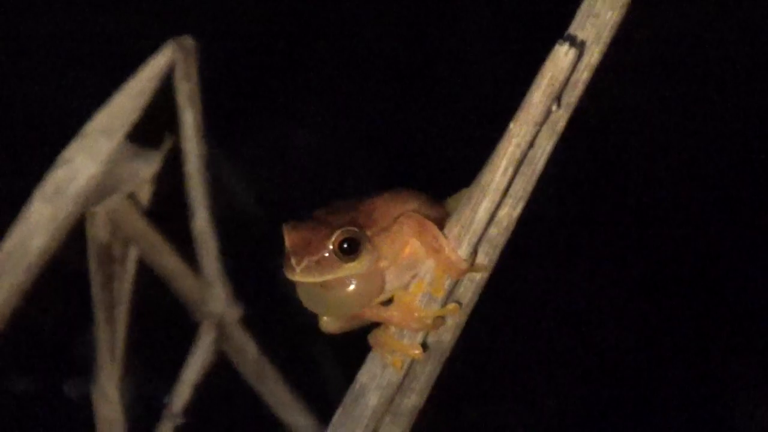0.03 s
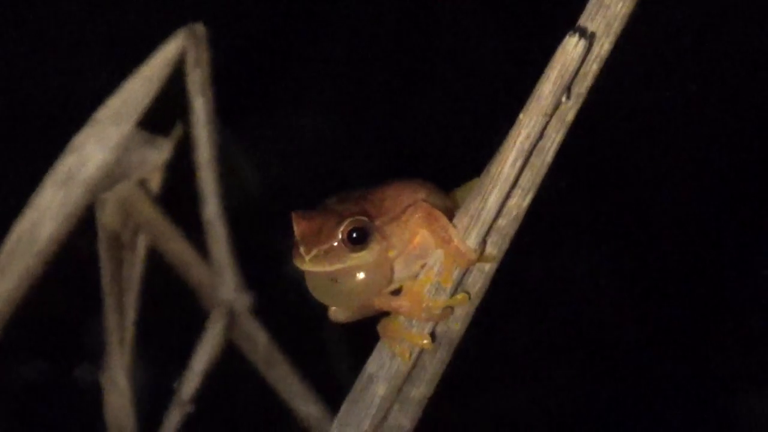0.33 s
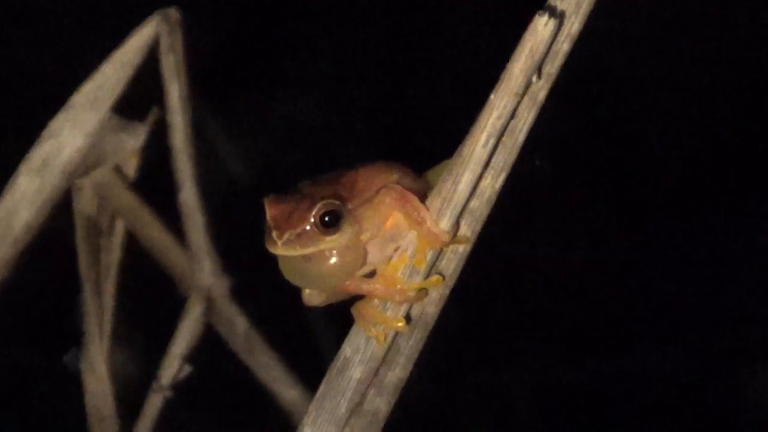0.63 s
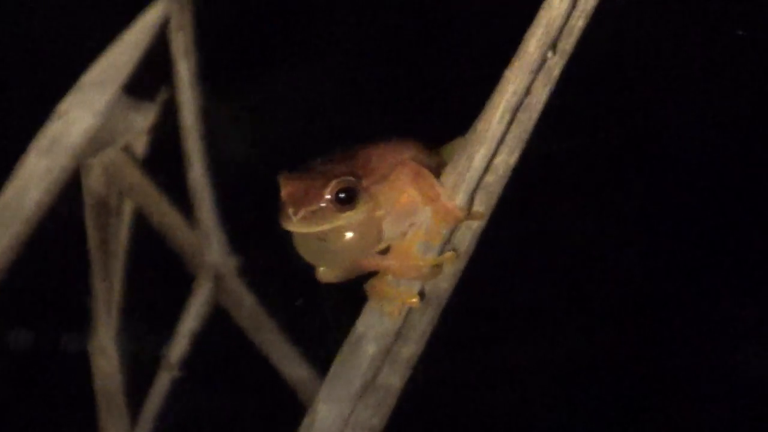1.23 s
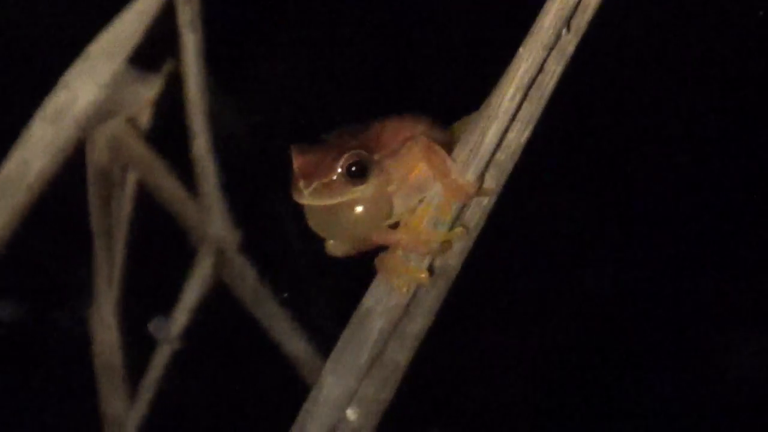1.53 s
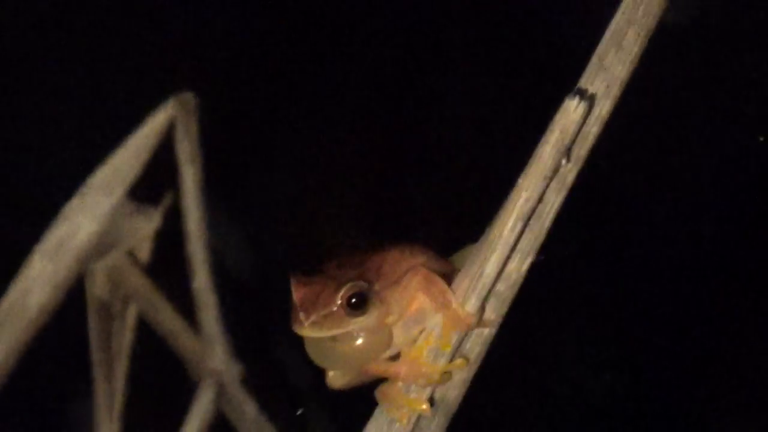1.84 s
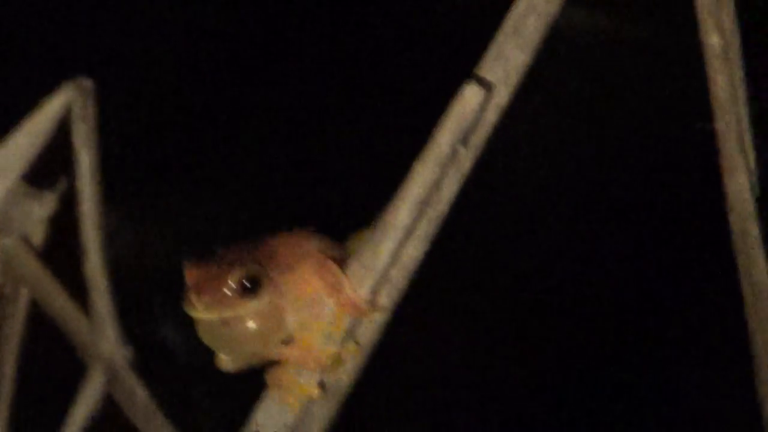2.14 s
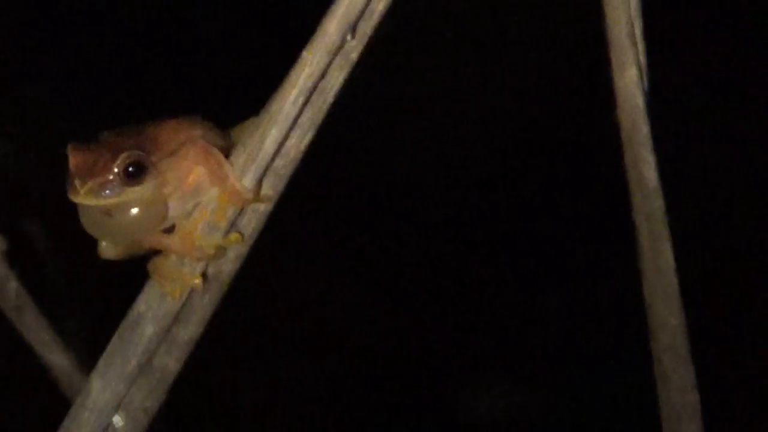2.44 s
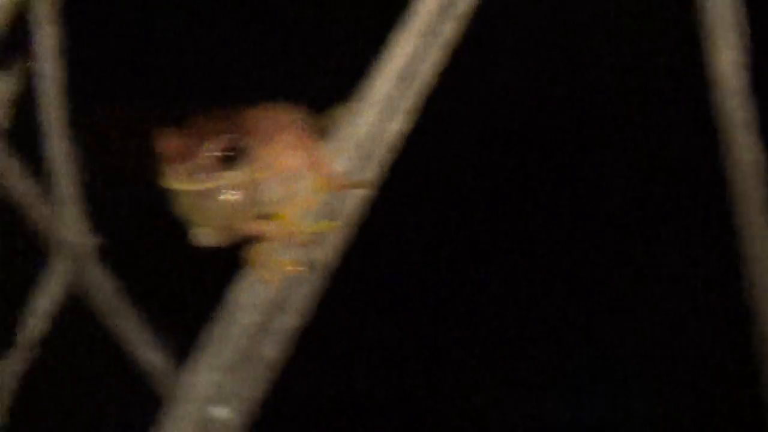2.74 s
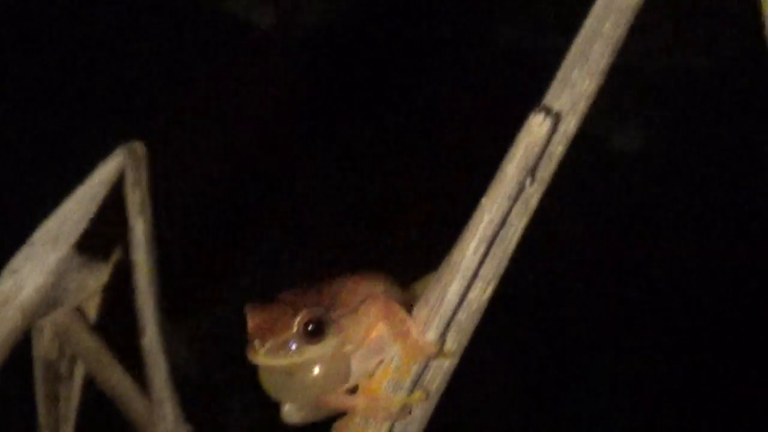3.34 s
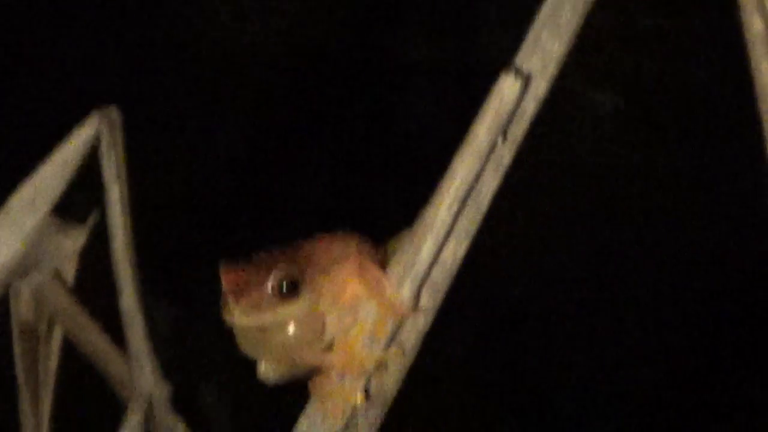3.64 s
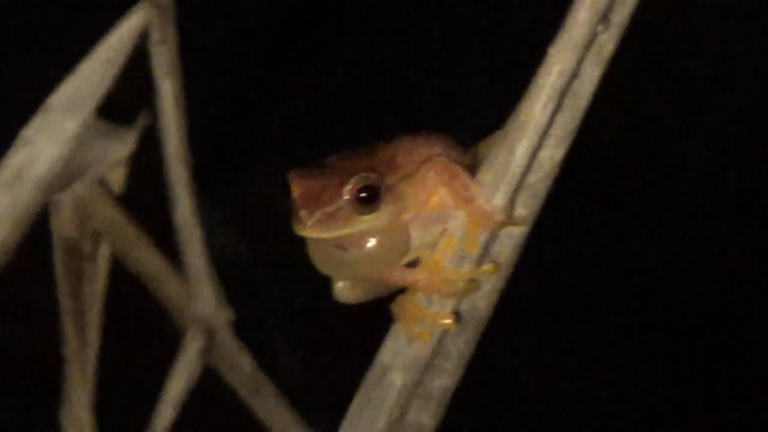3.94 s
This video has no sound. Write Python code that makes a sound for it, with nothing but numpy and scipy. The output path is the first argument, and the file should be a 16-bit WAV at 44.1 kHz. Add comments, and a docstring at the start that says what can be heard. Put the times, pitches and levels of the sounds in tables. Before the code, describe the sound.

Frogs call outdoors at night for about four seconds, with short falling whines two to four times a second, strongest at the start and near 0.9, 2.2, 2.9 and 3.9 seconds. Brief raspy croaks and pulsed rising sweeps fall between them. A low bloop comes at 0.3 seconds, and distant whoops from 0.8. Dense high insect trilling and cricket chirps run throughout, with a few small ticks and faint rumble.

```python
"""Night pond frog chorus

Near frogs give falling whines that swell at the vocal sac's resonance, and short croaks whose
pulses ring the throat. Another answers with a pulsed rising sweep; far ones whoop. Many insects
merge into a pulsing band above them, with single trills and cricket wing strokes standing out.
One bloop, a few ticks, low rumble and faint hiss; the plants give a light echo."""
import sys
import numpy as np
from scipy import signal
from scipy.io import wavfile
from scipy.ndimage import uniform_filter1d

SR = 44100
rng = np.random.default_rng(int(sys.argv[2]) if len(sys.argv) > 2 else 0)


def waveform_to_disk(signal):
    """Save audio, clipped to [-1, 1], as 16-bit WAV at the path in sys.argv[1]."""
    frames = np.transpose(np.atleast_2d(signal))
    scaled = np.clip(frames, -1, 1) * 32767
    samples = np.round(scaled).astype(np.int16)
    wavfile.write(sys.argv[1], SR, samples)


N = 176400


def amp(db):
    """dB to gain."""
    return 10 ** (np.asarray(db) / 20)


def unit(x):
    """Scale to rms 1."""
    return x / np.sqrt(np.mean(abs(x) ** 2) + 1e-20)


def read(points, hz):
    """Interpolate a spectrum over log frequency."""
    f, value = np.transpose(points)
    return np.interp(np.log(hz + 1), np.log(f), value)


def add(mix, start_s, sound, pan_db=0):
    """Mix in a sound; pan_db is left minus right."""
    at = round(start_s * SR)
    sound = sound[max(-at, 0):]
    part = mix[:, max(at, 0):][:, :len(sound)]
    part += amp([[pan_db / 2], [-pan_db / 2]]) * sound[:part.shape[1]]


def phase_of(hz):
    """Pitch curve to phase in rad."""
    return 2 * np.pi * np.cumsum(hz) / SR


def gate(t, rise_s, fall_s):
    """Linear fade in and out."""
    return np.clip(t / rise_s, 0, 1) * np.clip((t[-1] - t) / fall_s, 0, 1)


def drift(t, rate_hz):
    """Smooth complex noise, rms about 1."""
    size = N if len(t) > SR // 2 else SR // 2
    noise = rng.standard_normal(size) + 1j * rng.standard_normal(size)
    lowpass = np.exp(-(np.fft.fftfreq(size, 1 / SR) / rate_hz) ** 2)
    return unit(np.fft.ifft(noise * lowpass))[:len(t)]


def voice(hz, colour, low_db=0, harmonics=20):
    """Pulses coloured by the throat, which lets high harmonics out slightly later."""
    k = np.arange(1, harmonics + 1)[:, None]
    db = read(colour, k * hz) + low_db / (1 + (k * hz / 1900) ** 8)
    lag_rad = 4.75 * (k * hz / 2000) ** 2
    return unit((amp(db) * np.cos(k * phase_of(hz) - lag_rad)).sum(0))


def echo(x, t60_s, width=0.36):
    """Scatter from plants and water, partly alike in both ears."""
    t = np.arange(SR // 2) / SR
    reflections = rng.standard_normal((2, len(t))) * (rng.random((2, len(t))) < .05)
    mid, side = reflections * amp(-60 * t / t60_s) * (t > .004)
    tail = np.array([mid + width * side, mid - width * side])
    return signal.fftconvolve(x.mean(0)[None], tail / np.linalg.norm(tail[0]), axes=1)[:, :N]


# Calls: t/s, start f/Hz, f after drop/Hz, level/dB, sac boost/dB, 2nd harmonic/dB, upper ones/dB, L-R/dB
WHINES = [(-.12, 901, 675, -26.5, 13, 7, 4, 5.5), (.236, 905, 657.5, -34.5, -1, 1, -12, -3),
          (.275, 941, 686.5, -39, 6.5, 4, -3.5, -3.5), (.456, 937, 704, -36, 13.5, 2, 4.5, 1.5),
          (.941, 961, 666, -28.5, 11.5, -2, -10.5, 3.5), (1.418, 879, 660, -36, -3, -3.5, -21, -5.5),
          (1.831, 929, 697.4, -35, 13, 1.5, 3.5, 1.5), (2.152, 876, 678.6, -29.5, 8.5, 2, 0, 3),
          (2.618, 892, 655, -37.5, 2.5, -0.5, -13, -5.5), (2.865, 962, 662.6, -27.5, 10.5, 0.5, -9, 2.5),
          (3.105, 944, 682, -39, 4.5, 4, -8, -4.5), (3.28, 920, 674, -38.5, -2.5, -21, -27, -9.5),
          (3.609, 912.6, 714, -35.5, 13, 1.5, 3, 3.5), (3.7, 893.5, 652, -37, -1, -4, -10, -2.5),
          (3.903, 872, 652, -31, 11, 5.5, 0.5, 2.5)]
# Overtone spectrum: f/Hz, gain/dB
WHINE_COLOUR = [(900, -31), (1300, -13), (1700, -14), (2100, -15.5), (2600, -6), (3100, -18), (3700, -15),
                (5000, -32)]


def whines(drop_s=.043, sag_hz_per_s=700, sac_hz=794, sac_width_hz=106, fade_db_per_s=62):
    """Pitch drops fast, then sags; the unsteady call swells as it crosses the vocal sac's resonance."""
    out, t = np.zeros((2, N)), np.arange(0, 0.4, 1 / SR)
    for s, top_hz, low_hz, db, sac_db, second_db, upper_db, pan_db in WHINES:
        hz = low_hz + (top_hz - low_hz) * np.exp(-t / drop_s) - sag_hz_per_s * t
        waver = drift(t, 89)
        phase = phase_of(hz * (1 + 0.0053 * waver.real))
        call = amp(sac_db * np.exp(-((hz - sac_hz) / sac_width_hz) ** 2)) * np.sin(phase)
        overtones_db = [second_db, upper_db - 1.5, upper_db, upper_db - 9, upper_db - 13]
        for k, part_db in enumerate(overtones_db, 2):
            opening = np.minimum(t / 0.012 * amp(part_db), 1)  # weak overtones open later
            partial = (np.exp(1j * k * phase) * (1 + .55 * drift(t, 190))).imag
            call += amp(read(WHINE_COLOUR, k * hz) + part_db - 9.5 * t) * opening * partial
        wobble_db = 2.5 * drift(t, 23).real * np.minimum(t / 0.032, 1)
        shimmer = 1 + 0.25 * waver.imag
        envelope = gate(t, 0.0073, 0.21) * amp(db + wobble_db - fade_db_per_s * t)
        add(out, s, call * shimmer * envelope, pan_db)
    return out


# Far insects: f/Hz, line width/Hz, relative level/dB
TRILLERS = [(4000, 26.5, -67), (4306, 50, -51.5), (4406, 100, -50.5), (4510, 44.46, -47.5),
            (4533, 45, -49.5), (4734, 25.43, -44), (4770, 55.45, -48), (4880, 54, -51.5), (5013, 70, -53),
            (5095, 70, -56)]
# Band envelope with brief lulls: t/s, level/dB
TRILL_LEVEL = [(0.05, -39.5), (0.37, -41.5), (0.67, -38), (1.15, -42.5), (1.56, -38.5), (1.7, -40),
               (2.04, -38.5), (2.06, -44.5), (2.14, -39.5), (2.54, -40), (2.57, -48), (2.6, -37),
               (2.62, -42), (2.79, -41), (2.98, -42), (3.0, -39), (3.25, -41), (3.31, -42), (3.32, -41.5),
               (3.49, -40), (3.55, -45.5), (3.73, -37.5), (3.8, -40), (3.98, -42)]


def insect_band(pulse_hz=197.7, rate_spread=.11, width=0.12, trim_db=-1):
    """Trillers, each wavering and pulsing at its own pace, merge into one pulsing band."""
    band, t = np.zeros((2, N)), np.arange(N) / SR

    def pulses(depth, drift_hz):
        rate_hz = pulse_hz * (1 + rate_spread * drift(t, drift_hz).real)
        return np.exp(depth * np.cos(phase_of(rate_hz)))

    for hz, width_hz, db in TRILLERS:
        envelope = amp(db) * pulses(depth=.3, drift_hz=8.03)
        tone = envelope * np.exp(1j * phase_of(hz + width_hz * drift(t, 59.5).real))
        side = width * rng.choice([-1, 1]) * tone.imag
        band += tone.real + np.array([side, -side])
    level_db = trim_db + np.interp(t, *np.transpose(TRILL_LEVEL))
    return unit(band * pulses(depth=.25, drift_hz=20.1)) * amp(level_db)


# Background spectrum: f/Hz, relative density/dB
AIR_COLOUR = [(20, -19), (50, -20), (80, -4), (160, -1.5), (300, -4.5), (420, -5.5), (600, -3.5), (1000, 6),
              (1500, -3), (2000, -7), (2800, -3.5), (3500, -11), (4400, 5.5), (5400, -6.5), (6100, -11),
              (7500, -16.5), (11000, -18.5), (15500, -21.5)]
# Likeness of the ears: f/Hz, L-R correlation
AIR_CORRELATION = [(30, -.1), (70, 0.48), (200, 0.71), (1000, 0.97), (5000, 0.95), (8500, 0.87), (12000, 1)]


def air(level_db=-46, patch_db=2.5):
    """Low rumble, the patchy blur of the farthest chorus and faint hiss."""
    hz = np.fft.rfftfreq(1024, 1 / SR)
    noise = rng.standard_normal((5, N // 256 + 5, len(hz)))
    left, independent = noise[0] + 1j * noise[1], noise[2] + 1j * noise[3]
    correlation = np.clip(read(AIR_CORRELATION, hz), 0, 1)
    right = correlation * left + np.sqrt(1 - correlation ** 2) * independent
    patches = unit(uniform_filter1d(uniform_filter1d(noise[4], size=9, axis=0), size=5, axis=1))
    in_chorus = (hz > 450) & (hz < 5600)
    spectra = np.array([left, right]) * amp(read(AIR_COLOUR, hz) + patch_db * patches * in_chorus)
    _, wash = signal.istft(spectra.swapaxes(1, 2), nperseg=1024, noverlap=768)
    return amp(level_db) * unit(wash[:, :N])


# Far crickets: f/Hz, level/dB, mean chirp rate/Hz
CRICKETS = [(6212, -71, 16), (5895, -71, 8), (6350, -75.5, 1.1)]


def far_crickets():
    """Faint continuous tones, pulsing unevenly and drifting in level."""
    out, t = np.zeros((2, N)), np.arange(N) / SR
    for hz, db, rate_hz in CRICKETS:
        waver = drift(t, 14.4)
        gain = amp(db + 6.0 * drift(t, 2.0).real)
        pulses = 1 + np.cos(phase_of(rate_hz * (1 + 0.654 * waver.imag)))
        add(out, 0, gain * pulses * np.sin(phase_of(hz + 14 * waver.real)))
    return out


# Calls: t/s, level/dB, low harmonics/dB, scatter/dB, L-R/dB
CROAKS = [(.1335, -38, 11, 1.5, 1), (0.1938, -38, -3.5, -9, 5), (0.7493, -41.5, -7.5, -27, 5),
          (1.2279, -38, 6.5, -5, 2.5), (1.685, -49.5, 4, -6, -4), (2.446, -37, -2, -6.5, 5),
          (3.166, -45, 3, 0, 1)]
# Throat spectrum: f/Hz, gain/dB
CROAK_COLOUR = [(450, -29), (900, -4.5), (1200, -1.5), (1650, -3.5), (1950, -8), (2400, -1), (3050, -5.5),
                (3400, -12.5), (3900, -17), (5000, -34)]


def croaks(pitch_hz=238, length_s=0.048, sag=0.053, ring_hz=2990):
    """Rasping pulses ring the throat; the ring returns once and lingers; plants scatter the call."""
    out, scattered, lingering = np.zeros((3, 2, N))
    t = np.arange(0, length_s, 1 / SR)
    for s, db, low_db, scatter_db, pan_db in CROAKS:
        hz = pitch_hz * (1 - sag * t / length_s + 0.024 * drift(t, 145).real)
        rasp = 1 + 0.24 * drift(t, 620).real
        call = amp(db) * gate(t, 0.0014, 0.04) * voice(hz, CROAK_COLOUR, low_db) * rasp
        ring = signal.lfilter(*signal.iirpeak(ring_hz, 7, SR), call)
        call += amp(4) * ring
        add(out, s, call, pan_db)
        add(out, s + 0.055, amp(-3.5) * ring)
        add(scattered, s, amp(scatter_db) * call)
        add(lingering, s, amp(-7) * ring)
    return out + echo(scattered, t60_s=0.17) + echo(lingering, t60_s=0.34)


# Chirp onsets: t/s
CHIRPS = [.205, .46, .675, .97, 1.175, 1.432, 1.706, 1.912, 2.143, 2.38, 2.583, 2.82, 3.064, 3.305, 3.555,
          3.802]
# Wing strokes of one chirp: delay/s, length/s, start f/Hz, peak f/Hz, level/dB
WING_STROKES = [(0, 0.034, 5730, 5896, -49.5), (0.036, 0.014, 5710, 5860, -49)]


def cricket_chirps():
    """Two wing strokes per chirp, each an upward glide."""
    out = np.zeros((2, N))
    for delay_s, length_s, start_hz, peak_hz, db in WING_STROKES:
        t = np.arange(0, length_s, 1 / SR)
        glide_hz = start_hz + (peak_hz - start_hz) * np.sin(2 * t / length_s)
        for s in CHIRPS:
            hz = glide_hz + 10 * rng.standard_normal()
            add(out, s + delay_s, amp(db) * gate(t, 0.003, 0.007) * np.sin(phase_of(hz)))
    return out


def bloop(start_s=.272, hz=491):
    """One brief low tone."""
    out, t = np.zeros((2, N)), np.arange(0, 0.029, 1 / SR)
    add(out, start_s, amp(-25) * gate(t, 0.0055, 0.03) * np.sin(2 * np.pi * hz * t))
    return out


# Snaps: t/s, level before filter/dB, centre f/Hz, Q
TICKS = [(0.315, -29, 1800, 2.5), (1.048, -42, 9000, .8), (1.556, -46, 9000, .8), (2.2095, -29, 1900, .7),
         (2.532, -22, 3200, 2), (3.359, -46, 10500, .8), (3.5, -40, 7500, .7)]


def plant_ticks(decay_s=0.0015):
    """Small snaps in the plants, each through one broad resonance."""
    out, t = np.zeros((2, N)), np.arange(0, 0.029, 1 / SR)
    for s, db, hz, q in TICKS:
        snap = rng.standard_normal(len(t)) * np.exp(-t / decay_s)
        add(out, s, amp(db) * signal.lfilter(*signal.iirpeak(hz, q, SR), snap))
    return out


def bursts(rows, hz, glide_hz, pulse_hz, depth, waver_hz):
    """One insect's bursts of a pulsed, wavering tone."""
    out = np.zeros((2, N))
    for s, length_s, db in rows:
        t = np.arange(0, length_s, 1 / SR)
        waver = drift(t, 120)
        pulses = 1 + depth * np.cos(phase_of(pulse_hz * (1 + 0.073 * waver.imag)))
        tone = np.sin(phase_of(hz + glide_hz * t / length_s + waver_hz * waver.real))
        add(out, s, amp(db) * gate(t, 0.0049, 0.029) * pulses * tone)
    return out


# Bursts, all three: t/s, length/s, level/dB
WHISTLES = [(.405, 0.14, -44), (1.42, 0.075, -47.5), (2.08, 0.11, -44), (2.77, 0.205, -44),
            (3.58, 0.083, -46)]
BUZZES = [(.47, 0.18, -49), (1.48, 0.16, -44.5), (2.14, 0.19, -41.5), (2.72, 0.166, -41), (3.62, 0.15, -43)]
HIGH_TRILLS = [(.72, 0.18, -60.5), (1.54, 0.4, -65), (2.62, 0.22, -61.5), (3.87, .16, -59)]


def solo_insects():
    """A nearer insect's thin whistle, another insect's sagging buzz, and a high cricket's trill."""
    whistle = bursts(WHISTLES, hz=4140, glide_hz=0, pulse_hz=99, depth=0.24, waver_hz=15)
    buzz = bursts(BUZZES, hz=4570, glide_hz=-110, pulse_hz=100, depth=0.76, waver_hz=22)
    trill = bursts(HIGH_TRILLS, hz=6430, glide_hz=0, pulse_hz=32.4, depth=1.0, waver_hz=45)
    return whistle + buzz + trill


# Calls: t/s, level/dB, L-R/dB
SWEEPS = [(0.531, -42, -6.5), (1.164, -43.5, -5.5), (1.893, -41.5, -5.5), (2.681, -43, -7.5),
          (3.313, -43, -8)]
# Main tone of one call: t/s, f/Hz, gain/dB, pulse depth 0-1
SWEEP_SHAPE = [(0, 993, -14, 0), (0.069, 1040, -5, 0.1), (0.118, 1091, -1.5, 0.4), (0.143, 1144, 1, 0.83),
               (.162, 1438, 4, 0.94), (.178, 1660, 6, .6), (0.194, 1760, 5.5, 0), (0.201, 1880, -19, 0)]
# Weaker tone under it: t/s, f/Hz, gain/dB
UNDERTONE = [(.115, 824, -13), (.135, 855, -0.5), (.15, 900, -4), (.16, 900, -25)]


def sweeps(pulse_hz=125.15):
    """A frog's soft lead-in whips upward in pulses; a lower tone swells at the turn."""
    knots_s, hz, db, depth = np.transpose(SWEEP_SHAPE)
    low_s, low_hz, low_db = np.transpose(UNDERTONE)
    out, t = np.zeros((2, N)), np.arange(0, knots_s[-1], 1 / SR)
    under = amp(np.interp(t, low_s, low_db)) * np.sin(phase_of(np.interp(t, low_s, low_hz)))
    for s, level_db, pan_db in SWEEPS:
        waver = drift(t, 140)
        pulses = 1 + np.interp(t, knots_s, depth) * np.cos(phase_of(pulse_hz * (1 + 0.095 * waver.imag)))
        pitch_hz = np.interp(t, knots_s, hz) * (1 + 0.019 * waver.real)
        main = amp(np.interp(t, knots_s, db)) * np.sin(phase_of(pitch_hz))
        add(out, s, amp(level_db) * pulses * (main + under), pan_db)
    return out


# Calls: t/s, level/dB
WHOOPS = [(.797, -49.5), (1.14, -49), (1.345, -49), (1.5, -52), (1.65, -50.5), (2.39, -46.5), (2.535, -50),
          (2.74, -52.5), (3.06, -49.5), (3.24, -53.5), (3.45, -44.5)]
# Throat spectrum: f/Hz, gain/dB
WHOOP_COLOUR = [(450, -28), (700, 11.5), (900, 0.5), (1400, -3.5), (1900, -16), (2600, -44)]


def whoops(start_hz=385, end_hz=501.8, length_s=0.066, trim_db=4.5):
    """Short rising notes from far frogs."""
    out, t = np.zeros((2, N)), np.arange(0, length_s, 1 / SR)
    for s, db in WHOOPS:
        hz = np.linspace(start_hz, end_hz, len(t)) * (1 + 0.026 * drift(t, 30).real)
        call = voice(hz, WHOOP_COLOUR, harmonics=6)
        add(out, s, amp(db + trim_db) * gate(t, 0.018, 0.01) * call, pan_db=1.0)
    return out


# Catches: t/s, level/dB
CATCHES = [(2.134, -33), (3.88, -31.5)]
# Throat spectrum: f/Hz, gain/dB
CATCH_COLOUR = [(600, -31), (915, 4), (1220, 0), (1520, -16), (1830, -11.5), (2130, -7), (2440, -17),
                (3400, -21), (4200, -40)]


def throat_catches(pitch_hz=302.9, length_s=0.029):
    """A few throaty pulses just before two of the whines."""
    out, t = np.zeros((2, N)), np.arange(0, length_s, 1 / SR)
    for s, db in CATCHES:
        hz = pitch_hz * (1 + 0.038 * drift(t, 150).real)
        add(out, s, amp(db) * gate(t, 0.009, 0.0049) * voice(hz, CATCH_COLOUR), pan_db=2.5)
    return out


def scene():
    """Near and far callers among the plants."""
    near = whines() + throat_catches() + croaks() + sweeps() + bloop() + plant_ticks()
    far = whoops()
    solo = solo_insects() + far_crickets() + cricket_chirps()
    scattered = echo(amp(-14) * near + amp(-3) * far + amp(-13) * solo, t60_s=0.29)
    return near + far + solo + scattered + insect_band() + air()


def record(dry):
    """Brief opening silence, then band-limited sound."""
    start_s, cutoff_hz = .035, 15850
    lowpass = signal.firwin(511, cutoff_hz, window=("kaiser", 9), fs=SR)
    return signal.oaconvolve(dry * (np.arange(N) > start_s * SR), lowpass[None], "same")


dry = scene()
out = record(dry)
waveform_to_disk(out)
```